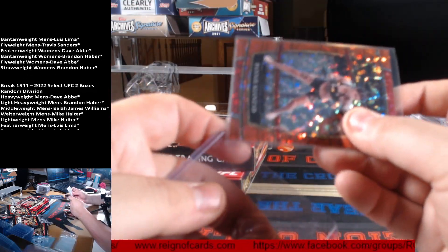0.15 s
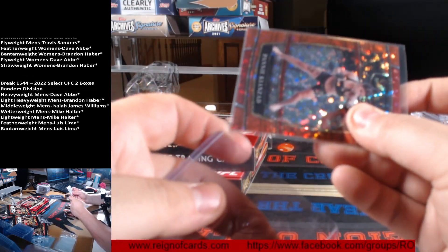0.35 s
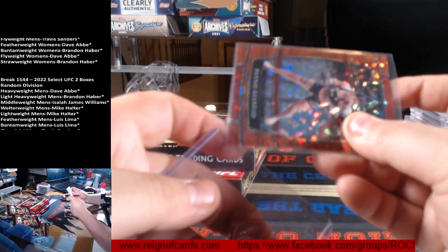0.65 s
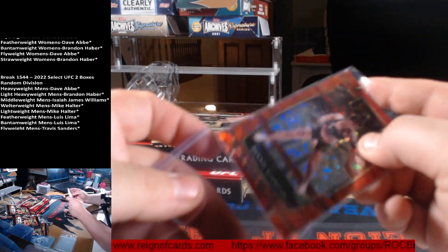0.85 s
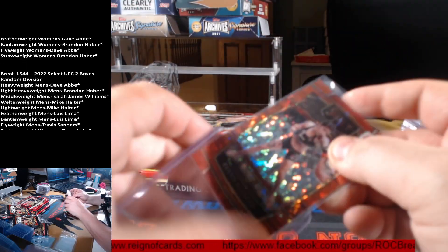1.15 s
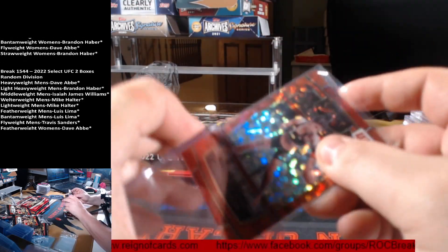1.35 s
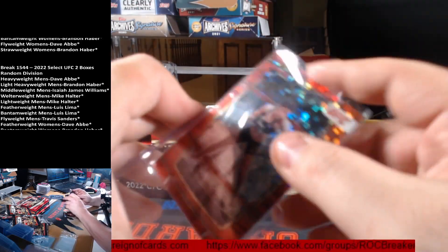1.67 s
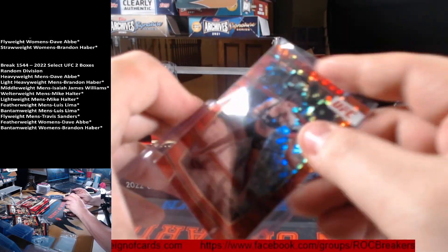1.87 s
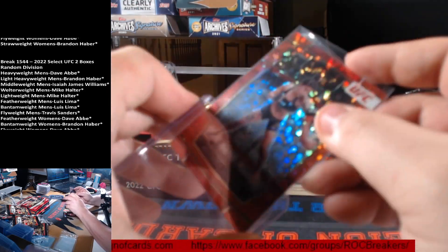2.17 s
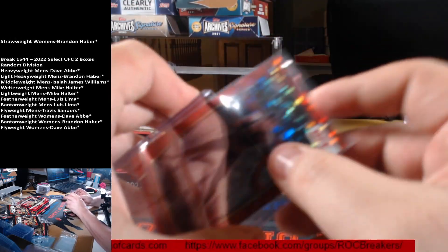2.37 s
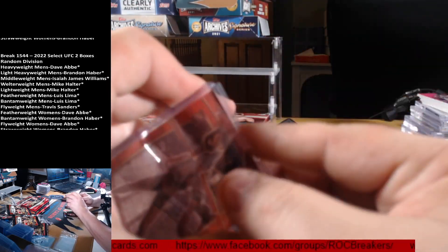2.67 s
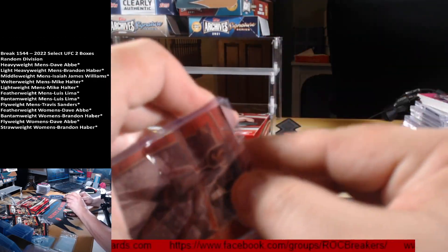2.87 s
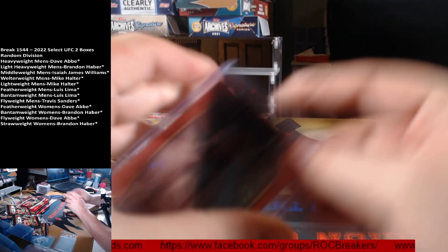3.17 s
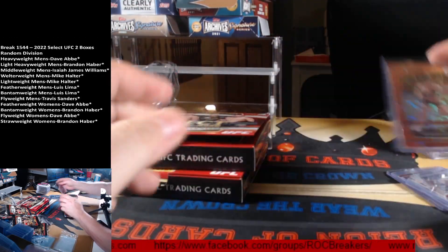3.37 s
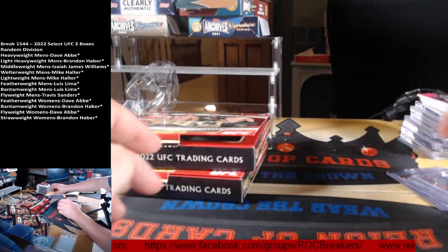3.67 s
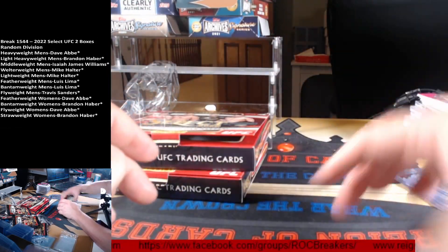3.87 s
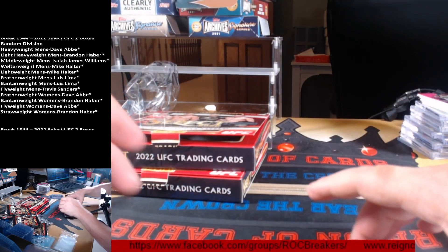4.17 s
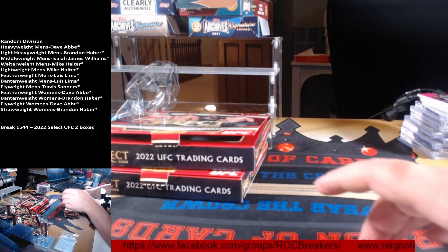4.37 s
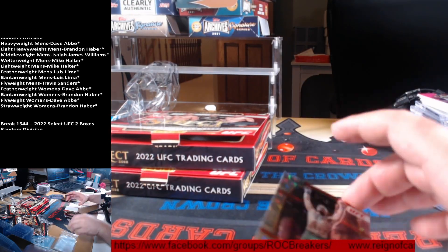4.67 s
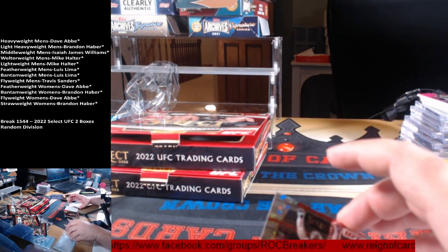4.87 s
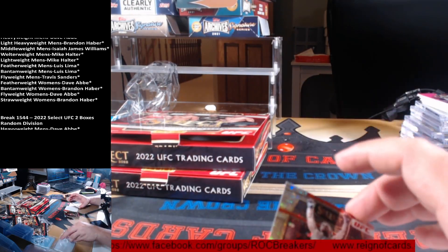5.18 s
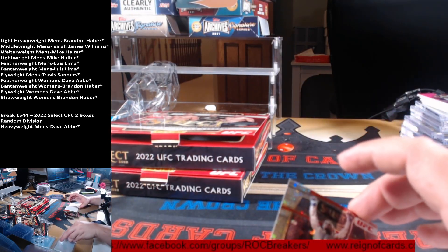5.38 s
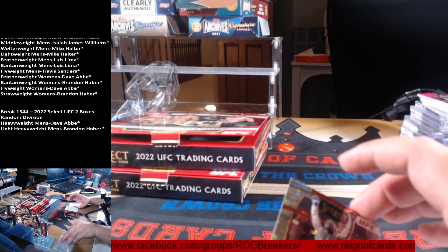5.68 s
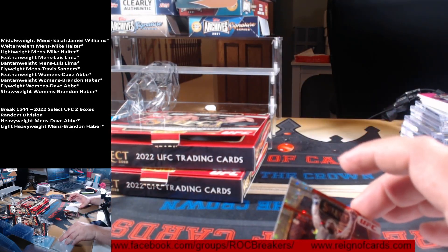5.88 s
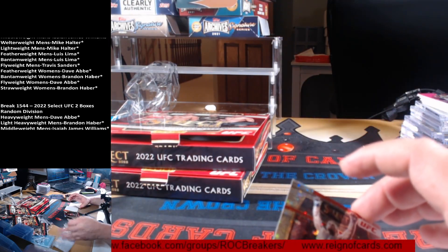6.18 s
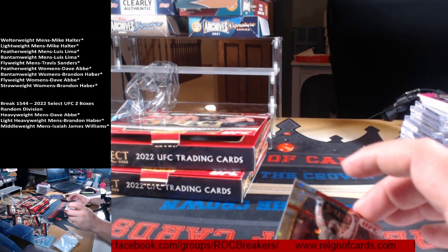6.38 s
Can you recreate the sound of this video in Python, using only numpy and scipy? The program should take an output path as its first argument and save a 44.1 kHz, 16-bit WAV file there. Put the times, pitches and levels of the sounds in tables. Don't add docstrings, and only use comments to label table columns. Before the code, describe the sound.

Close handling of a card in plastic: faint ticks, a sharp clatter of stiff holder on table, brief squeaks, then dense crinkling film.

```python
import sys
import numpy as np
from scipy import signal
from scipy.fft import rfft, irfft
from scipy.io import wavfile
from scipy.ndimage import uniform_filter1d

SR = 44100
rng = np.random.default_rng(int(sys.argv[2]) if len(sys.argv) > 2 else 0)


def log_audio(samples):
    frames = np.atleast_2d(samples).T
    limited = np.clip(frames, -1, 1)
    pcm = np.round(limited * 32767).astype(np.int16)
    wavfile.write(sys.argv[1], SR, pcm)


def gain_from_decibels(decibels):
    exponent = np.asarray(decibels, float) / 20
    return 10 ** exponent


N = 288105
LEAD_S = 0.01


def evened(x):
    return x / np.sqrt(np.mean(x ** 2) + 1e-20)


def read(points, hz):
    f, value = np.transpose(points)
    return np.interp(np.log(hz + 1), np.log(f + 1), value)


def band(x, lo_hz, hi_hz, order=2):
    sos = signal.butter(order, [lo_hz, hi_hz], "bandpass", fs=SR, output="sos")
    return signal.sosfilt(sos, x)


def add(mix, s, sound):
    part = mix[round(s * SR):][:len(sound)]
    part += sound[:len(part)]


def follow(rows, t):
    s, *columns = np.transpose(rows)
    return [gain_from_decibels(np.interp(t, s, c, -150, -150)) for c in columns]


# f/Hz, level/dB
HUM_COLOUR = [(20, -35), (82, -6), (233, -3.5), (500, -10.5), (3480, -12.5), (7140, -21.5), (9380, -40.5),
              (13000, -100)]


def hum(level_db=-73, fan_db=-82.5, fan_hz=2978):
    hz = np.fft.rfftfreq(N, 1 / SR)
    noise = irfft(rfft(rng.standard_normal(N)) * gain_from_decibels(read(HUM_COLOUR, hz)), N)
    fan = np.sin(2 * np.pi * fan_hz * np.arange(N) / SR)
    return gain_from_decibels(level_db) * evened(noise) + gain_from_decibels(fan_db) * fan


# f/Hz, time to fall 60 dB/s
ROOM_RING = [(100, 0.43), (500, 0.24), (2000, 0.28), (5000, 0.27), (9000, 0.27)]


def room(x):
    taps = np.zeros(SR)
    at = np.arange(200, SR - 20, 20)
    taps[at + rng.integers(0, 20, len(at))] = rng.choice([-1., 1.], len(at))
    hz, t, z = signal.stft(taps, SR, nperseg=256)
    fade = gain_from_decibels(-60 * t / read(ROOM_RING, hz)[:, None])
    tail = signal.istft(z * fade, SR, nperseg=256)[1]
    return signal.fftconvolve(x, tail / np.linalg.norm(tail))[:N]


# t/s, rumble level/dB, thud level/dB
TABLE_BUMPS = [(0.0, -47, -57), (0.159, -51.5, -64), (0.358, -59, -68), (.73, -57, -95), (0.859, -44, -50),
               (.93, -48, -55), (1.18, -55.5, -55), (1.359, -90, -55), (2.019, -89, -63),
               (2.23, -65.5, -71), (2.99, -92, -52), (3.201, -53, -64.5), (3.32, -50.5, -60),
               (3.441, -38.5, -53), (3.599, -52.5, -33.5), (3.691, -68.5, -32), (3.841, -69, -46.5),
               (4.75, -50.5, -86), (5.101, -41.5, -58.5), (5.148, -47, -52.5), (5.368, -57.5, -87),
               (5.74, -59.5, -81), (5.98, -58.5, -84), (6.159, -48.5, -50.5), (6.22, -67, -54),
               (6.36, -54.5, -81)]


def table():
    rise, fall = [[360], [720]], [[260], [250]]  # rumble, thud (dB per s)
    t, power = np.arange(0, N, 64) / SR, 0
    for s, *db in TABLE_BUMPS:
        slope = np.where(t < s, rise, fall)
        power = power + gain_from_decibels(np.c_[db] - slope * abs(t - s)) ** 2
    rumble, thud = (np.interp(np.arange(N) / SR, t, np.sqrt(row)) for row in power)
    noise = rng.standard_normal((2, N))
    low = evened(band(noise[0], 22, 36, order=3))
    high = evened(band(noise[1], 78, 140, order=3))
    return rumble * low + thud * high


# t/s, level/dB, f/Hz, time to fall 60 dB/s
DULL_KNOCKS = [(.475, -54, 590, 0.32), (.85, -54, 545, 0.29), (1.154, -49.5, 468, 0.24),
               (1.471, -52.5, 540, 0.33), (1.69, -54.5, 529, 0.26), (2.63, -45, 509, 0.074),
               (3.686, -24, 342, 0.085), (3.686, -28, 624, 0.099), (3.307, -33.5, 343.5, 0.12),
               (3.606, -36, 303, 0.088), (4.14, -49, 509, 0.34), (4.89, -53, 508, 0.2),
               (5.2, -50.5, 372.3, 0.43), (6.36, -44.5, 423, 0.3), (6.43, -46.5, 599, 0.18),
               (5.965, -47, 498, 0.23), (3.198, -46.5, 302, 0.19), (5.11, -51, 476, 0.36),
               (5.27, -47, 559, 0.15), (5.34, -53, 450, .3), (6.12, -47, 330, 0.18),
               (1.2, -53.5, 350, 0.22)]
# t/s, level/dB, f/Hz, time to fall 60 dB/s
BRIGHT_TAPS = [(0.895, -52, 926, 0.22), (1.47, -55.5, 1186, 0.35), (3.308, -33.5, 1052, 0.054),
               (3.685, -30, 1114, 0.068), (5.107, -40.5, 964, 0.15), (5.26, -40.5, 946, 0.1),
               (5.544, -35.5, 855, 0.069), (5.75, -51.5, 777, 0.29), (5.745, -51, 1050, .3),
               (5.915, -49, 891, 0.17), (5.982, -36.5, 717, 0.16), (6.41, -39, 945, 0.066),
               (3.28, -44, 1160, 0.18)]
# t/s, level/dB, f/Hz, time to fall 60 dB/s
DEEP_SLAMS = [
    (2.982, -22.5, 183, 0.068),
    (3.603, -28, 120, 0.067),
    (3.684, -15.5, 181, 0.12),
    (3.683, -21, 103.7, 0.14),
    (3.603, -26, 200, 0.11),
]


def knocks():
    rows = DULL_KNOCKS + BRIGHT_TAPS + DEEP_SLAMS
    out, t = np.zeros(N), np.arange(SR // 3) / SR
    for (s, db, hz, t60), noise in zip(rows, rng.standard_normal((len(rows), len(t)))):
        rattle = evened(band(noise, 0.87 * hz, 1.084 * hz))
        ring = 0.52 * np.sin(2 * np.pi * hz * t) + 0.34 * rattle
        onset = np.minimum(t / 0.0095, 1)
        add(out, s, gain_from_decibels(db + 3.5 - 60 * t / t60) * ring * onset)
    return out


# t/s, level/dB, f/Hz, glide/(Hz per s), fall/(dB per s)
SLIPS = [
    (.028, -45.5, 1530, -150, 417),
    (3.786, -33, 1869, -1500, 300),
    (4.124, -36.5, 1818, 226, 687.5),
    (4.736, -50.5, 1476, 205, 489),
]


def squeaks(rise=750, top_s=0.0082):
    out, t = np.zeros(N), np.arange(-2000, 9000) / SR
    for s, db, hz, glide, fall in SLIPS:
        tone = np.sin(2 * np.pi * np.cumsum(hz + glide * t.clip(None, 0.045)) / SR)
        away = np.hypot(t, top_s) - top_s
        level = gain_from_decibels(db + 0.5 - np.where(t < 0, rise, fall) * away)
        add(out, s + t[0], level * tone * signal.windows.tukey(len(t), 0.15))
    return out


def bursts(ms, rise=0.4, creak=0.023, creak_ms=5.8, spike=1.4):
    t = 1000 * (np.arange(3600) / SR - LEAD_S)
    ms = np.maximum(ms, 0.2)[:, None]
    shape = np.exp(-np.maximum(t, 0) / ms) * np.clip(t / (rise * ms), 0, 1) ** 2
    shape += creak * np.exp(-abs(t) / creak_ms)
    first = np.arange(len(t)) == shape.argmax(1)[:, None]
    return shape * (rng.standard_normal(shape.shape) + spike * first / np.maximum(ms, 0.5))


# t/s, level/dB, low f/Hz, high f/Hz, length/ms
SLEEVE_TICKS = [(.355, -52, 5830, 8760, 2.1), (0.886, -41.5, 7000, 9070, 5.6), (0.999, -57, 6100, 7500, 40),
                (1.04, -52, 5950, 7300, 6.5), (1.06, -58, 6500, 8800, 12), (1.155, -54, 6050, 7500, 9.2),
                (1.336, -40, 5590, 6110, 0.54), (1.336, -51, 6790, 7300, 1.3),
                (1.336, -49, 8730, 9500, 0.98), (1.469, -61, 5485, 5543, 2.1), (1.47, -57, 2300, 2390, 2.4),
                (1.506, -55.5, 5100, 6160, 4.5), (1.581, -59, 5850, 6500, 7.7), (.89, -60, 5550, 5880, 23),
                (1.155, -60, 3510, 3700, 10), (1.59, -63.5, 5470, 5830, 30), (1.47, -59, 6800, 8800, 3.3),
                (1.68, -58, 3900, 4100, 15), (2.545, -57, 3180, 3400, 2),
                (1.673, -43, 5720, 8200, 17), (1.676, -47.5, 3750, 4810, 15), (1.844, -42.5, 5270, 8700, 1.7),
              (1.854, -30.5, 5270, 7130, 1.6), (1.854, -40, 3840, 5600, 3.3),
              (2.161, -59.5, 6040, 6260, 2.1), (2.311, -50.5, 6040, 6450, 4.3),
              (2.388, -50, 6750, 9700, 43), (2.438, -51.5, 6990, 7500, 11), (2.543, -42, 6550, 8650, 0.93),
              (2.578, -45, 4800, 5900, 8.9), (2.6, -29, 5500, 8550, 1.6), (2.599, -30, 3840, 4550, 1.27),
              (2.612, -22, 4850, 8450, 1.8), (2.612, -47.5, 2772, 2847, 4.9),
              (2.599, -45, 3100, 3310, 10.4), (2.695, -40, 6210, 8950, 1.7)]
# t/s, level/dB, low f/Hz, high f/Hz, length/ms
HOLDER_SCRAPE = [(3.2, -51, 690, 865, 13), (3.8, -49, 1072, 1187, 20), (3.3, -45.5, 450, 810, 7),
                 (3.204, -31, 3400, 4300, 8.9), (3.199, -40.5, 4200, 5670, 9),
                 (3.202, -39.5, 5450, 5940, 9.5), (3.201, -42, 5800, 8400, 10),
                 (3.202, -38.5, 2500, 2780, 11.5), (3.199, -56.5, 1822, 1868, 3.9),
                 (3.235, -34.5, 8000, 8900, 2.6), (3.236, -43, 2914, 3800, 7.1),
                 (3.299, -42.5, 3280, 3720, 8.2), (3.298, -41.5, 2480, 2746, 8.6),
                 (3.427, -47, 5500, 6400, 9.9), (3.662, -34, 5060, 5630, 13.4),
                 (4.101, -62, 7430, 7970, 9.4), (3.5912, -19, 4900, 5800, 1.2), (2.955, -49, 7300, 8300, 5),
                 (3.9, -45.5, 4500, 8500, 3), (3.215, -42, 4850, 5050, 15), (3.49, -60, 7400, 8500, 5),
                 (3.8, -56.5, 6700, 7000, 15), (5.025, -53.5, 2250, 2500, 20),
                 (5.025, -54.5, 1310, 1450, 20)]


def sleeve():
    rows, out = SLEEVE_TICKS + HOLDER_SCRAPE, np.zeros(N)
    for (s, db, lo_hz, hi_hz, ms), burst in zip(rows, bursts(np.transpose(rows)[4])):
        tick = band(burst, lo_hz, hi_hz, order=3)
        add(out, s - LEAD_S, gain_from_decibels(db) * tick / abs(tick).max())
    return out


# t/s, level/dB, fold size/dB
WRAPPER_GRIP = [
    (4.84, -63.5, -6),
    (5.178, -47, -4),
    (5.6, -49.5, 1.5),
    (5.7, -48, -6),
    (5.88, -58.5, -8),
    (5.98, -51, 5),
    (6.3, -50, 8),
    (6.44, -53.5, 10),
    (6.53, -67, 6),
]


def rustle(per_s=700, spread_db=3.0, clump_db=6.5, body_db=-6, middle_db=-3, edge_db=-8):
    effort, fold = follow(WRAPPER_GRIP, np.arange(N) / SR)
    clumps = gain_from_decibels(clump_db * evened(uniform_filter1d(rng.standard_normal(N), size=500)))
    sizes = gain_from_decibels(spread_db * np.minimum(rng.exponential(1, N), 4))
    creases = sizes * (rng.random(N) < clumps * per_s / SR)
    creases = creases * rng.choice([-1., 1.], N) + 0.24 * rng.standard_normal(N)
    zones = (450, 4300), (3050, 5760), (5500, 7500)
    body, middle, edge = [evened(band(creases, *zone, order=4)) for zone in zones]
    return effort * (gain_from_decibels(body_db) * fold * body + gain_from_decibels(middle_db) * middle + gain_from_decibels(edge_db) * edge)


def layered(burst, zones, shares):
    return sum(gain * part / abs(part).max() for gain, part in zip(shares, zones))


# low f/Hz, high f/Hz
SHEET_ZONES = [
    (400, 1350),
    (1500, 2980),
    (3050, 6130),
    (5500, 8800),
]
# t/s, level/dB, weight/dB, edge/dB, length/ms
HOLDER_SNAPS = [(2.9877, -12, -4, -1.5, 0.87), (2.9914, -20, 0.5, -1.5, 0.63), (3.1725, -37, -15, -3, 0.25),
                (3.1976, -29, -13, 0, 2.5), (3.2954, -37.5, -9.5, 0.5, 0.59), (3.303, -35.5, -6.5, -3.5, 4),
                (3.5912, -9, -26, 6, 1.415), (3.6058, -6.5, -4, -2.5, .9), (3.617, -22, -11.5, -3, 3),
                (3.6686, -30.5, -22, -19.5, 0.7), (3.6834, -24, -6.5, -1, 1.9),
                (3.6874, -25.5, -5.5, -4.5, 0.34)]
# t/s, level/dB, weight/dB, edge/dB, length/ms
WRAPPER_CRUSHES = [(4.875, -37, -46, -4.5, 47), (5.1055, -18.5, -16.5, -10, 3), (5.201, -25, -9.5, -3, 9),
                   (5.5065, -20.5, -28, -13, 1.5), (5.555, -38, -20.5, -8, 9), (5.75, -25, -16.5, -8.5, 18),
                   (5.805, -33, -17, 1, 8.8), (5.909, -33, -26, -7.5, 25), (6.139, -26.5, -0.5, 1, 17),
                   (6.25, -22, -8.5, -7, 14.8), (6.352, -17, -3.5, -5, 17.4), (3.62, -30, -18, 2.5, 7.4)]


def snaps(rows, low_db):
    out = np.zeros(N)
    for (s, db, weight_db, edge_db, ms), burst in zip(rows, bursts(np.transpose(rows)[4])):
        edge = min(gain_from_decibels(edge_db), 1)
        main = np.sqrt(1.02 - edge ** 2)
        shares = gain_from_decibels(weight_db + low_db), gain_from_decibels(weight_db), main, edge
        parts = [band(burst, *zone, order=4) for zone in SHEET_ZONES]
        add(out, s - LEAD_S, gain_from_decibels(db) * layered(burst, parts, shares))
    return out


# t/s, level/dB, weight/dB, centre f/Hz, length/ms
WRAPPER_CRACKLES = [(4.8667, -39.5, -35.5, 4370, 1.13), (4.8878, -30, -43, 4660, 0.55),
                    (4.952, -33.5, -39, 4700, 2), (5.0259, -35, -28, 4650, 4.6),
                    (5.0425, -28.5, -19.5, 4500, 0.46), (5.0711, -36, -15, 5370, 3.4),
                    (5.0908, -36.5, -31.5, 4560, 0.3), (5.11, -17, -15, 3630, 0.78),
                    (5.1425, -31.5, -20, 5000, 0.46), (5.1555, -20, -12.5, 3400, 2.5),
                    (5.2055, -15, -26, 4450, 0.76), (5.262, -26, -14.5, 3700, 0.42),
                    (5.3106, -31, -9, 3580, 1.4), (5.3168, -27.5, -6, 4170, 0.89),
                    (5.3322, -22, -17.5, 3600, 1.4), (5.3542, -26.5, -20.5, 3620, 0.57),
                    (5.374, -34.5, -12.5, 6050, 2.4), (5.386, -41.5, -21, 5500, 2),
                    (5.4125, -29.5, -28.5, 4570, 0.39), (5.4447, -28, -37, 4400, 0.42),
                    (5.4754, -19, -37.5, 4380, 0.31), (5.4935, -17.5, -41, 3900, 0.66),
                    (5.5164, -21, -27.5, 5030, 0.73),
                    (5.5454, -18, -15, 4870, 1.2), (5.5747, -13, -14.5, 3620, 0.48),
                    (5.622, -19.5, -16.5, 3520, 0.69), (5.6942, -30.5, -29, 3380, 5),
                    (5.7484, -25, -28, 3400, 1), (5.7486, -26.5, -29.5, 5020, 1.3),
                    (5.8055, -23.5, -20.5, 4680, 1.14), (5.9087, -26.5, -29, 3350, 2.05),
                    (5.93, -31.5, -35, 6070, 0.61), (5.9967, -26.5, -7.5, 3780, 1.9),
                    (5.9866, -11, -22, 4540, 0.47), (6.013, -24.5, -17.5, 6600, 1.5),
                    (6.0295, -25, -24, 3550, 1.4), (6.0625, -24, -26, 4170, 4),
                    (6.1199, -9, -5, 4560, 0.42), (6.237, -23, -14, 3300, 4.1),
                    (6.2445, -21, -8, 4840, 0.47), (6.3085, -31, -28, 8000, 1.5),
                    (6.334, -29.5, -10, 5600, 16), (6.3553, -26.5, -1, 4610, 3.1),
                    (6.4243, -27.5, -3, 4800, 0.31), (6.4297, -24.5, 0.5, 4620, 2.1),
                    (5.1196, -24.5, -24.5, 5000, 1.6), (5.1646, -28.5, -18, 4500, 1.2),
                (5.2036, -18.5, -23, 4380, 2), (5.252, -33, -16, 3600, 1.3),
                (5.4685, -30.5, -34, 3800, 1.5), (5.533, -26.5, -30, 3800, 1.3),
                (5.5427, -20.5, -23, 4360, .3), (5.557, -30, -29, 5050, 1.8),
                (5.611, -25.5, -16.5, 3600, 0.96), (5.7304, -32.5, -35.5, 6500, 2),
                (5.761, -29, -31, 5320, 1.5), (5.813, -29, -34.5, 6100, 3),
                (5.9629, -33.5, -15, 3320, 0.93), (6.0479, -27, -25, 4400, .8), (6.059, -26, -23, 4000, 2),
                (6.1, -35, -6.5, 4000, 1.3), (6.1184, -16.5, -6.5, 5420, 0.72), (6.13, -27, -10, 5000, 2.4),
                (6.366, -20, -11, 4570, 2.8), (6.254, -26, -10, 6500, 4)]


def crackles(low_db=-9.5, wide_db=-4.0, ring_db=-7.5, ring_width=0.05):
    rows, out = WRAPPER_CRACKLES, np.zeros(N)
    for (s, db, weight_db, hz, ms), burst in zip(rows, bursts(np.transpose(rows)[4])):
        centre = max(0.76 * hz, 3050), min(1.405 * hz, 8800)
        zones = SHEET_ZONES[:2] + [centre, (3100, 8000)]
        parts = [band(burst, *zone, order=4) for zone in zones]
        parts += [band(burst, hz * (1 - ring_width), hz * (1 + ring_width), order=1)]
        shares = gain_from_decibels([weight_db + low_db, weight_db, 0, wide_db, ring_db])
        add(out, s - LEAD_S, gain_from_decibels(db) * layered(burst, parts, shares))
    return out


def scene():
    film = sleeve()
    near = snaps(HOLDER_SNAPS, low_db=-3) + snaps(WRAPPER_CRUSHES, low_db=-15.5) + crackles()
    crackle, tones, blows = rustle(), squeaks(), knocks()
    wet = room(gain_from_decibels(-1) * film + gain_from_decibels(-6) * near + crackle + gain_from_decibels(-9) * tones + gain_from_decibels(-12) * blows)
    return (film + near + crackle + tones + wet + blows + table())[None]


# f/Hz, level/dB
OPEN_OVER = [(60, -2), (300, 13), (1000, 8.5), (2500, 8), (5000, 7.5), (7500, 5.5), (9000, 9.5)]
# t/s, length/s, level/dB
LOOSE_TIMES = [
    (-.1, 0.89, 3.5),
    (4.192, 1, 5),
]
# t/s, length/s, level/dB
CLAMP_TIMES = [
    (3.27, .38, 14),
    (3.72, .42, 21),
    (5.62, .36, 4),
]


def suppress(x, background, depth_db=-14, hold_s=0.075, close_db_per_s=250, knee_db=1.2, learn_s=0.35,
             learn_db=-4, picky=0.45, stagger_s=0.071, high_db=-4, uneven_db=2.0, uneven_per_clamp=0.41):
    both = np.array([x + background / gain_from_decibels(depth_db), background])
    hz, t, z = signal.stft(both, SR, nperseg=512, noverlap=384)
    hz = hz[:, None]
    hum_db = 10 * np.log10((abs(z[1]) ** 2).mean(1, keepdims=True) + 1e-20) - depth_db
    power = uniform_filter1d(uniform_filter1d(abs(z[0]) ** 2, size=5, axis=1), size=2, axis=0)
    over_db = 10 * np.log10(abs(power) + 1e-20) - hum_db

    keep = np.exp(-t[1] / learn_s)
    learnt_db = signal.lfilter([1 - keep], [1, -keep], over_db, axis=1) + learn_db
    learnt_db = np.maximum(learnt_db, 0)

    streaks = rng.standard_normal(power.T.shape).T
    streaks = uniform_filter1d(uniform_filter1d(streaks, size=110, axis=1), size=2, axis=0)
    streaks = evened(streaks).clip(-3, 1.3)
    fussy_db = 1.2 * np.minimum(streaks, 0)

    late = t + stagger_s * streaks + 0.078 * np.clip(hz / 1500 - 1, -1, 1)
    loose_db = sum(db * np.clip(np.minimum(t - s, s + length - t) / 0.14, 0, 1)
                   for s, length, db in LOOSE_TIMES)
    clamp_db = sum(db * np.clip(np.minimum(t - s, s + length - late) / 0.08, 0, 1)
                   for s, length, db in CLAMP_TIMES)
    streaks = streaks * (uneven_db + uneven_per_clamp * clamp_db)

    high = np.clip((hz - 2000) / 1000, 0, 1)
    audible = (hz > 400) * (hz < 9500)
    shut_db = depth_db + audible * ((1 - high) * loose_db + high * high_db - clamp_db + streaks)

    over_db = over_db - learnt_db - read(OPEN_OVER, hz) + picky * streaks + fussy_db - 0.17 * clamp_db
    want_db = -100 / (1.5 + np.exp(np.clip(over_db / knee_db, -30, 30)))
    fall = close_db_per_s * t
    held_db = np.maximum.accumulate(want_db + fall, axis=1) - fall + close_db_per_s * hold_s
    gain_db = np.minimum(np.maximum(held_db, shut_db), 0)
    return signal.istft(z[0] * gain_from_decibels(gain_db), SR, nperseg=512, noverlap=384)[1][:N]


def roll_off(x):
    return signal.sosfilt(signal.butter(12, 9530, fs=SR, output="sos"), x)


def record(dry):
    narrow = signal.sosfilt(signal.cheby1(8, 0.5, 8000, fs=SR, output="sos"), dry[0])
    mix = suppress(narrow, hum())[None]
    return roll_off(mix)


dry = scene()
out = record(dry)
log_audio(out)
```